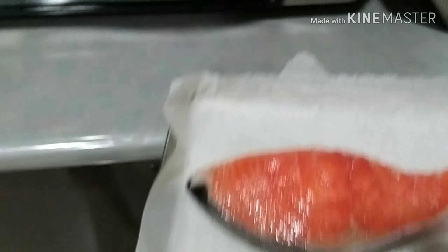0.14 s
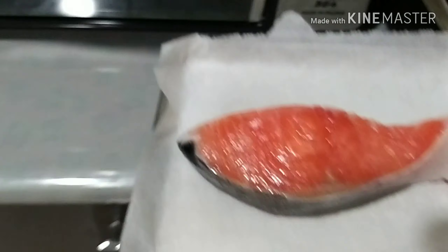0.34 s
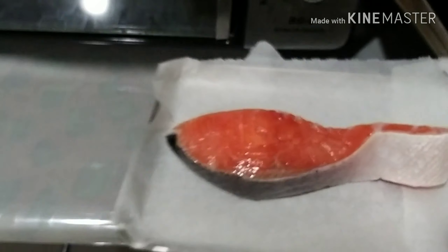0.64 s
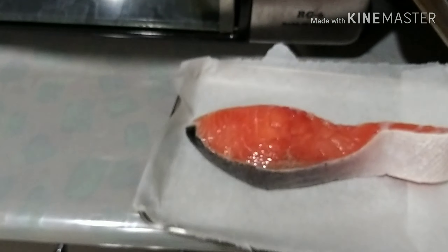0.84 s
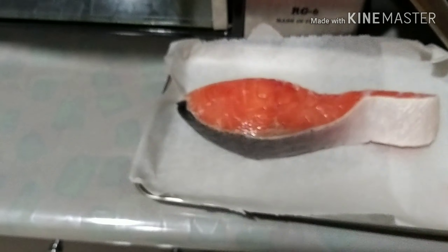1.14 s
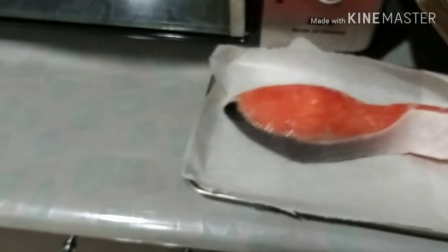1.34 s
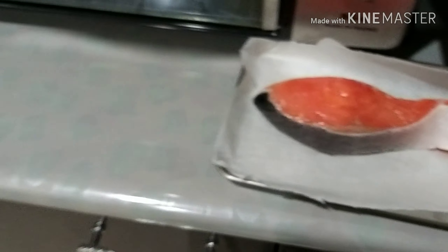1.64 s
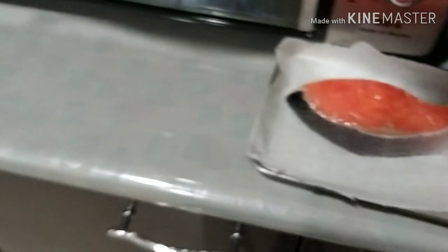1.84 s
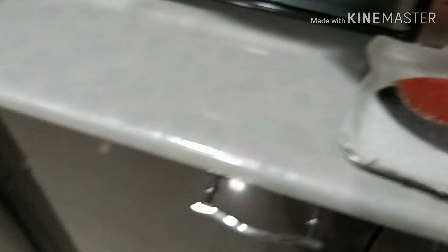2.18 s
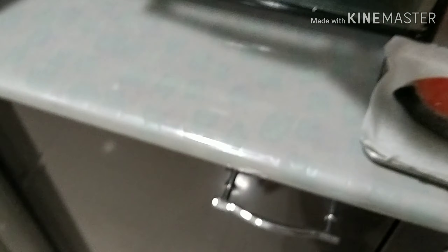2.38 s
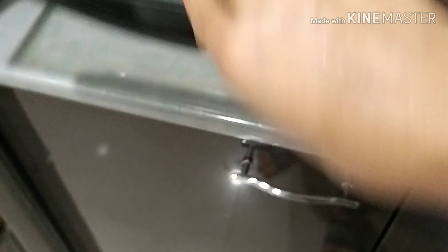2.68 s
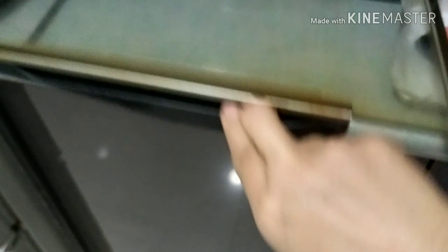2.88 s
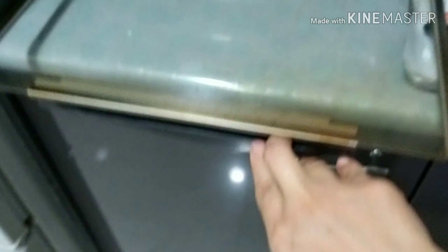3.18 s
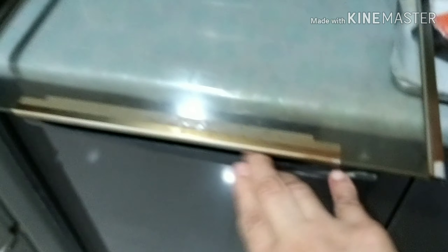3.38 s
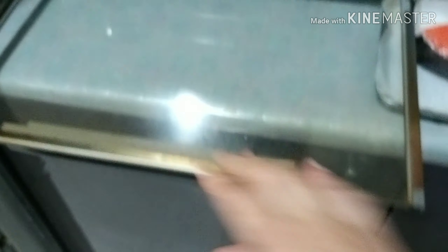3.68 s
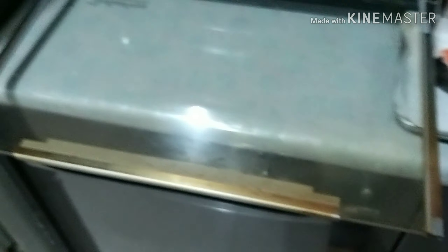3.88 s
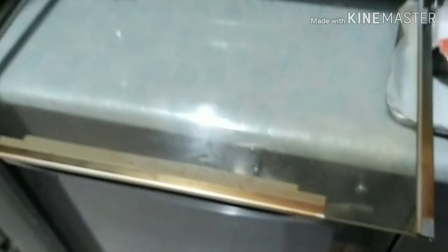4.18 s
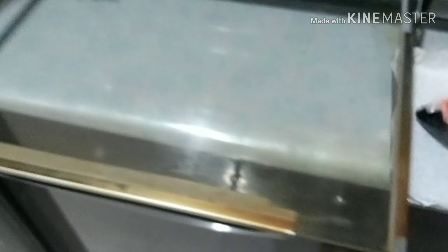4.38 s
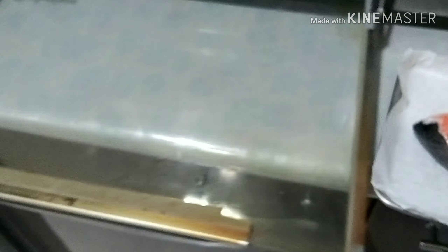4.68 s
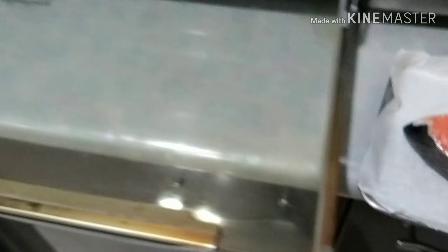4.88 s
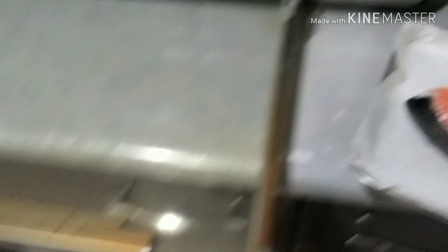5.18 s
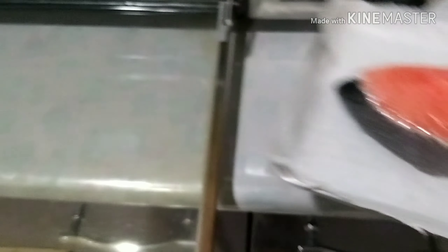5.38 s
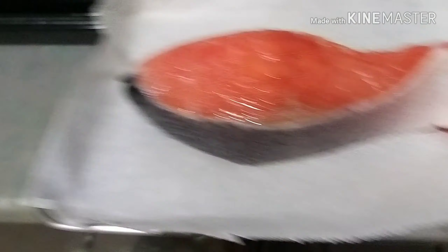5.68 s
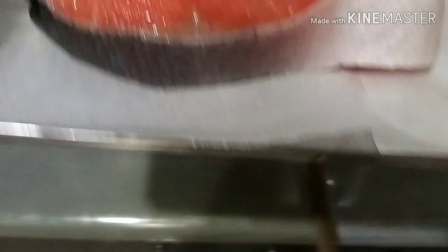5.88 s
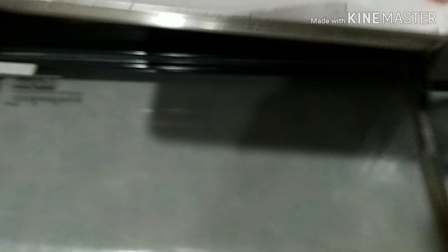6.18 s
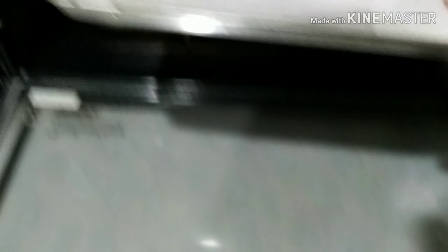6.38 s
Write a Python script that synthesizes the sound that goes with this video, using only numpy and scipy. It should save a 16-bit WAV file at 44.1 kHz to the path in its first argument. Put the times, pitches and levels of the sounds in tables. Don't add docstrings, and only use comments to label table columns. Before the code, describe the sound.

A quiet, hard-surfaced kitchen, close handheld microphone, with a steady low hush and slight hiss. Faint rubbing opens. At about 0.87 s a metal tray's corner bangs onto the counter, the loudest hit; its far edge bounces around 0.96-1.02, it rocks back at 1.07, scuffs and ticks, then clanks flat at 1.42 with a short thin ring and small touches until 1.6. From 2.1 low hand thumps and rubs begin, with a weak hinge squeak at 2.25 and dull jolts at 2.5 and 2.85. A harder door knock comes at 3.05, swaying low; dry squeaky chirps around 1 kHz run 3.3-3.65, followed by a thin, faint spring whine. At 4.3 the oven door drops onto its stop with a crash, glass and frame rattling quickly until 4.55. Quiet rubbing fades. At 5.7 the tray clicks free sharply, and around 6.45 it knocks onto the rack with a brief ring.

```python
import sys
import numpy as np
from scipy import signal
from scipy.fft import rfft, irfft
from scipy.io import wavfile
from scipy.ndimage import uniform_filter1d

SR = 44100
rng = np.random.default_rng(int(sys.argv[2]) if len(sys.argv) > 2 else 0)


def invert_db(x):
    u = np.asarray(x, float) / 20
    return 10 ** u


def generate_wav(signal):
    frames = np.transpose(np.atleast_2d(signal))
    scaled = np.clip(frames, -1, 1) * 32767
    pcm = np.round(scaled).astype(np.int16)
    wavfile.write(sys.argv[1], SR, pcm)


N = 287973


def evened(x):
    return x / np.sqrt(np.mean(x ** 2) + 1e-20)


def read(points, hz):
    f, value = np.transpose(points)
    return np.interp(np.log(hz + 1), np.log(f + 1), value)


def add(mix, s, sound):
    part = mix[round(s * SR):][:len(sound)]
    part += sound[:len(part)]


def band(x, lo, hi):
    return signal.sosfilt(signal.butter(3, [lo, hi], "band", fs=SR, output="sos"), x)


def coloured(points, patchy_db):
    frames, hz = N // 256 + 5, np.fft.rfftfreq(1024, 1 / SR)
    a, b, patches = rng.standard_normal((frames, 513, 3)).T
    patches = uniform_filter1d(patches, size=10, axis=0)
    patches = evened(uniform_filter1d(patches, size=12, axis=1))
    patches = patchy_db * patches / (1 + hz[:, None] / 2500)
    z = (a + 1j * b) * invert_db(read(points, hz)[:, None] + patches)
    return evened(signal.istft(z, nperseg=1024, noverlap=768)[1][:N])


def swell(s, rise_s, fall_s):
    bend = 0.71
    start = max(s - 2 * rise_s, 0)
    t = np.arange(start - s, 2 * fall_s, 1 / SR)
    return start, invert_db(-20 * abs(t / np.where(t < 0, rise_s, fall_s)) ** bend)


def room_floor():
    # (frequency [Hz], density [dB per Hz])
    floor_colour = [(20, -35), (35, -14), (60, 1.5), (120, -1), (230, -3), (400, -8), (700, -16),
                    (1300, -23.5), (2600, -25.5), (3600, -21.5), (5500, -23.5), (9000, -26), (15500, -23)]
    return invert_db(-59) * coloured(floor_colour, patchy_db=1.7)


def room():
    # (frequency [Hz], t60 [s])
    decay = [(100, 0.57), (260, 0.91), (700, 0.28), (1840, 0.54), (4850, 0.24), (12000, 0.53)]
    taps = np.zeros(SR // 2 + SR // 4)
    at = np.arange(330, len(taps) - 20, 16)
    taps[at + rng.integers(0, 16, len(at))] = rng.choice([-1., 1.], len(at))
    hz, t, z = signal.stft(taps, SR, nperseg=256)
    tail = signal.istft(z * invert_db(-60 * t / read(decay, hz)[:, None]), SR, nperseg=256)[1]
    return tail / np.linalg.norm(tail)


def rumble():
    # (time of peak [s], rise [s], fall [s], level [dB])
    heaves = [(2.08, 0.027, 0.18, -64), (2.27, 0.11, 0.03, -65), (2.35, 0.072, 0.046, -57.5),
              (2.548, 0.071, 0.24, -47.5), (2.86, 0.077, 0.1, -55), (3.13, 0.069, 0.13, -51.5),
              (3.33, 0.24, 1, -65.5), (3.689, 0.17, 0.052, -47.5), (3.81, 0.16, 1, -54),
              (4.05, 0.018, 0.18, -61), (4.34, 0.034, 0.14, -42)]
    # (frequency [Hz], density [dB per Hz])
    rumble_colour = [(35, -44), (70, 10), (100, -6), (160, -13), (230, 4), (330, -5), (500, -7.5),
                     (900, -16), (2000, -45)]
    effort = np.zeros(N)
    for s, rise_s, fall_s, peak_db in heaves:
        start, gain = swell(s, rise_s, fall_s)
        add(effort, start, invert_db(peak_db) * gain)
    return effort * band(coloured(rumble_colour, patchy_db=1.5), 62, 2000)


def thumps():
    # (time [s], level [dB], pitch [Hz], t60 [s])
    blows = [(0.867, -51, 348, 0.23), (1.07, -54, 370, 0.098), (1.363, -30.5, 332, 0.023),
             (1.424, -43, 105, 0.19), (2.083, -41, 113, 0.1), (2.35, -46, 90, 0.081),
             (2.541, -36, 207, 0.14), (2.561, -41.5, 198, 0.12), (2.854, -48, 307, 0.1),
             (3.058, -44, 140, 0.15), (3.056, -37, 288, 0.2), (3.107, -39, 225, 0.1),
             (3.564, -57, 228.6, 0.49), (3.652, -45, 237, 0.13), (3.688, -43, 231, 0.095),
             (3.79, -41, 269, 0.22), (2.543, -41.5, 87, 0.16), (3.664, -43, 85, 0.26),
             (4.046, -36, 436, 0.049), (4.305, -37.5, 382.5, 0.18), (4.419, -39, 196, 0.11),
             (4.494, -31, 260, 0.032), (6.44, -39, 275, 0.18), (6.498, -39.5, 230, 0.14)]
    out, t = np.zeros(N), np.arange(SR // 2) / SR
    for s, peak_db, hz, t60 in blows:
        wobble = evened(band(rng.standard_normal(len(t)), 0.44 * hz, 1.17 * hz))
        shape = invert_db(-60 * t / (t60 + .01)) * (1 - np.exp(-t / .007))
        add(out, s, invert_db(peak_db) * shape * (np.sin(2 * np.pi * hz * t) + 0.78 * wobble))
    return out


def booms():
    # (time [s], hold [s], fade [s], level [dB], pitch [Hz])
    sways = [
        (3.057, 0.044, 0.046, -40, 93.4),
        (3.125, .02, 0.046, -43, 90.5),
        (3.798, 0.033, .05, -48, 81),
    ]
    # (time [s], hold [s], fade [s], level [dB], pitch [Hz])
    panel_rings = [(.869, 0.0079, 0.028, -32, 860), (.87, 0.0088, 0.041, -36.5, 713),
                   (.869, .01, .06, -36.5, 1411), (.884, 0.0092, .04, -40, 2246),
                   (.962, 0.0074, 0.037, -32, 730), (1.419, 0.0069, 0.034, -35, 870),
                   (1.44, 0.014, 0.022, -35, 799), (1.45, 0.02, .08, -48, 269.4),
                   (3.055, 0.0028, 0.054, -57, 3620), (4.44, .02, .04, -51, 4300),
                   (4.49, 0.017, 0.036, -53.5, 1993), (5.709, .002, 0.027, -53, 4030)]
    out, t = np.zeros(N), np.arange(SR // 4) / SR
    for s, hold_s, fade_s, level_db, hz in sways + panel_rings:
        shape = (1 - np.exp(-t * hz / 0.5)) * invert_db(-20 * np.maximum(t - hold_s, 0) / fade_s)
        add(out, s, invert_db(level_db) * shape * np.sin(2 * np.pi * hz * t))
    return out


def rubs():
    # (time of peak [s], rise [s], fall [s], fizz level [dB], body relative to fizz [dB])
    strokes = [(0.021, 0.063, 0.19, -64, -7), (0.17, 0.098, 0.12, -66.5, 5.5),
               (1.148, 0.048, 0.074, -56, 3), (1.196, 0.016, 0.035, -54, -7), (1.36, 0.18, 0.28, -52.5, 0),
               (3.334, 0.044, 0.068, -62, 6), (3.65, .015, 0.031, -73, 15), (1.5, 0.033, 0.12, -62, -7),
               (1.612, 0.026, 0.097, -59.5, 3), (2.2, 0.37, 0.95, -62.5, -8), (2.6, 0.23, 0.2, -74, 11),
               (2.87, 0.077, 0.15, -74, -1), (3.542, 0.052, 0.068, -53.5, -5.5),
               (3.625, 0.004, 0.19, -63, 9.5), (3.88, 0.83, 0.75, -71.5, 5.5),
               (4.268, 0.063, 0.035, -51.5, 1), (4.306, 0.002, 0.088, -42, 7.5),
               (4.345, 0.018, .04, -49, 6), (4.379, 0.055, 0.05, -40.5, 0), (4.408, .03, .06, -47.5, 4.5),
               (4.44, 0.017, 0.054, -53, 1), (4.462, .02, 0.063, -51, -9), (3.057, 0.0052, 0.071, -56, 5),
               (4.54, 0.057, 0.27, -63, 6), (4.812, 0.17, 0.37, -67, -7), (4.985, 0.012, 0.23, -69, 4),
               (5.735, 0.044, .06, -57, -6), (5.785, 0.06, 0.044, -57.5, 0.5),
               (0.895, 0.019, 0.065, -51, 12), (5.934, .015, 0.083, -66, -7), (6.45, 0.013, 0.13, -58, 12),
               (6.52, 0.072, 0.074, -47, -2)]
    slips_per_s, spread_db, top_db = 1800, 4.2, -8.5
    slips = invert_db(spread_db * np.minimum(rng.exponential(1, N), 3.5))
    slips = slips * (rng.random(N) < slips_per_s / SR)
    slips = evened(slips * rng.standard_normal(N)) + 1.24 * rng.standard_normal(N)
    low, mid = evened(band(slips, 480, 990)), evened(band(slips, 1150, 2400))
    fizz, top = evened(band(slips, 2700, 4980)), evened(band(slips, 6500, 10800))
    body = evened(low + invert_db(-1.0) * mid)
    speed, weight = np.zeros(N), np.zeros(N)
    for s, rise_s, fall_s, fizz_db, body_db in strokes:
        start, gain = swell(s, rise_s, fall_s)
        add(speed, start, invert_db(fizz_db) * gain)
        add(weight, start, invert_db(fizz_db + body_db) * gain)
    return speed * (fizz + invert_db(top_db) * top) + weight * body


def ticks():
    # (time [s], level [dB], pitch [Hz], t60 [s])
    touches = [(1.168, -43, 4230, 0.0044), (1.183, -50, 2920, 0.011), (1.194, -41.5, 2420, 0.022),
               (1.3116, -39, 2120, 0.0062), (1.5484, -53, 3000, 0.009), (1.612, -44, 3980, 0.014),
               (2.359, -50, 4000, 0.016), (2.908, -46.5, 4560, 0.0045), (3.621, -54.5, 4780, 0.02),
               (4.2302, -49, 2740, 0.015), (5.68, -58, 4130, 0.021), (5.708, -40, 4000, 0.0086),
               (5.7184, -61, 4130, 0.01), (5.756, -49, 3200, 0.01), (5.776, -51, 2100, 0.011),
               (5.7875, -50, 2430, 0.01), (5.934, -61, 4400, 0.01)]
    out, t = np.zeros(N), np.arange(SR // 20) / SR
    for s, peak_db, hz, t60 in touches:
        spread, phase = rng.random((2, 12, 1))
        tick = np.sin(2 * np.pi * (hz * (0.748 + 0.642 * spread) * t + phase)).sum(0)
        tick = tick * invert_db(-60 * t / (t60 + 0.0026)) * (1 - np.exp(-t / 0.00072))
        add(out, s, invert_db(peak_db + 3.5) * tick / abs(tick).max())
    return out


def snaps():
    # (time [s], level [dB], low edge [Hz], high edge [Hz], t60 [s])
    clicks = [(1.149, -45, 4000, 9100, 0.025), (1.195, -34, 4500, 13600, 0.046),
              (1.548, -44, 3000, 8000, 0.034), (2.907, -55.5, 1870, 2380, 0.033),
              (4.261, -48, 500, 9000, .03), (4.358, -36, 800, 6000, 0.012), (4.399, -32, 800, 5970, 0.006),
              (1.4188, -25, 3560, 6630, 0.0088), (3.621, -44, 1500, 5500, 0.03),
              (4.047, -53, 296, 1200, 0.048), (5.7079, -28, 3380, 5200, 0.0083),
              (5.7097, -31, 1500, 15200, 0.032), (5.718, -45, 5000, 14000, .02),
              (6.5, -39, 14200, 15400, .03)]
    out, t = np.zeros(N), np.arange(SR // 20) / SR
    for s, peak_db, low_hz, high_hz, t60 in clicks:
        puff = band(rng.standard_normal(len(t)) * invert_db(-60 * t / t60), low_hz, high_hz)
        add(out, s, invert_db(peak_db) * puff / abs(puff).max())
    return out


def stick_slip(rows, waver, half_db, third_db):
    out = np.zeros(N)
    for s, rise_s, fall_s, level_db, hz in rows:
        start, gain = swell(s, rise_s, fall_s)
        gain = gain[:SR]
        drift, flutter = (evened(uniform_filter1d(v, size=300))[:len(gain)]
                          for v in rng.standard_normal((2, SR)))
        turn = 2 * np.pi * np.cumsum(hz * (1 + waver * drift)) / SR
        tone = np.sin(turn) + invert_db(half_db) * np.sin(turn / 2) + invert_db(third_db) * np.sin(3 * turn)
        level = invert_db(level_db + 8.5 + 3.5 * np.clip(flutter, -3, 1.5))
        add(out, start, level * gain * tone)
    return out


def hinge_squeaks():
    # (time of peak [s], rise [s], fall [s], level [dB], pitch [Hz])
    squeak_rows = [
        (2.245, 0.05, 0.085, -63.5, 1053),
        (2.35, .04, 0.11, -70, 1024),
        (3.315, .01, 0.054, -58, 1056),
        (3.37, 0.081, 0.11, -66, 1042),
        (3.53, 0.0098, 0.032, -59.5, 1046),
        (3.555, 0.035, 0.01, -56, 1030),
        (3.585, 0.014, 0.05, -60, 1073),
        (3.62, 0.033, 0.016, -60.5, 1020),
        (3.645, 0.014, 0.04, -62.5, 1150),
    ]
    return stick_slip(squeak_rows, waver=.03, half_db=-30, third_db=-12)


def spring_whine():
    # (time of peak [s], rise [s], fall [s], level [dB], pitch [Hz])
    whine_rows = [
        (3.86, 0.1, 0.46, -76, 3545),
        (3.54, 0.04, 0.043, -68, 2500),
        (3.79, 0.026, 0.032, -73, 2500),
        (4.5, 0.024, 0.049, -76, 3500),
    ]
    return stick_slip(whine_rows, waver=.005, half_db=-6, third_db=-40)


def knocks(rows, modes, top_db, ring_db, crack_db, crack_s, chatter_s):
    centres = [900, 2100, 4300, 10000]
    out, t = np.zeros(N), np.arange(SR // 4) / SR
    hz, mode_db, mode_t60 = np.transpose(modes)
    mode_t60 = np.clip(mode_t60, .03, np.minimum(.25, 360 / hz))
    rings = invert_db(-60 * t / mode_t60[:, None]) * np.sin(2 * np.pi * hz[:, None] * t)
    crowd_hz = np.fft.rfftfreq(len(t), 1 / SR)
    crowd = invert_db(read([(150, -9.0), (450, 2.0), (1200, -0.5), (9000, -14.0), (16000, -20.5)], crowd_hz))
    shares, crowd_shares = (np.array([read(list(zip(centres, row)), f) for row in np.eye(len(centres))])
                            for f in (hz, crowd_hz))
    centre_hz = np.array(centres)[:, None]
    for s, peak_db, mid_db, high_db, t60 in rows:
        luck, contacts = rng.standard_normal(len(hz)), rng.random((2, 1500))
        strike = np.sign(luck) * invert_db(ring_db + mode_db + 2 * luck)
        clatter = irfft(rfft(rng.standard_normal(len(t))) * crowd * crowd_shares, len(t))
        clatter = clatter * invert_db(-60 * t / 0.87)
        chatter = (contacts[0] < .02) * (contacts[1] - .5) * 0.63
        chatter = chatter * np.exp(-t[:1500] / chatter_s)
        chatter[0] = 1
        fade = invert_db(-60 * t / (t60 * (centre_hz / 2000) ** -.15 + 0.017))
        fade = fade + invert_db(crack_db) * np.exp(-t / crack_s)
        rise = 1 - np.exp(-t * centre_hz / 3.5)
        parts = ((shares * strike) @ rings + clatter) * fade * rise
        parts = signal.fftconvolve(parts, chatter[None], axes=1)
        peaks = invert_db(peak_db + np.array([0, mid_db, high_db, high_db + top_db])) / abs(parts).max(1)
        add(out, s, peaks @ parts)
    return out




def rack_knocks():
    # (time [s], level [dB], mid [dB], high [dB], t60 [s])
    blows = [
        (6.434, -37, 6, 3.5, 0.17),
        (6.443, -40, 8, -10, 0.63),
        (6.493, -32.5, -16, -10, 0.32),
        (6.501, -36, -10, 3.5, 0.047),
        (6.513, -34, -12, -10, 0.13),
    ]
    # (pitch [Hz], level [dB], t60 [s])
    modes = [(500, -8, 0.057), (730, -10, .1), (992, -1.5, 0.14), (1130, -10, 0.09), (1390, -13, .15),
             (1628, 0.5, 0.24), (1850, -13, 0.09), (2364, -8, 0.23), (2970, -11, .06), (3200, -20, .13),
             (3220, -9, 0.21), (3540, -11, .1), (4130, -20, 0.22), (4870, -22, .054)]
    return knocks(blows, modes, top_db=-6.5, ring_db=-6.5, crack_db=-27, crack_s=.004, chatter_s=0.022)


def door_knocks():
    # (time [s], level [dB], mid [dB], high [dB], t60 [s])
    blows = [
        (2.519, -54.5, -4, -7, 0.8),
        (2.845, -51, -16, -9, 0.5),
        (3.054, -36.5, -8.5, -1.5, 0.99),
        (3.305, -45.5, -4.5, -3.5, 0.72),
        (3.527, -57, -6, -8, 0.33),
        (3.623, -56, -20, -14, 0.19),
        (4.048, -49, -8, -12, 0.58),
    ]
    # (pitch [Hz], level [dB], t60 [s])
    modes = [(781, 2, 0.48), (920, -11, 0.45), (1115, -4, 0.12), (1400, -39, 5.0), (1780, -18, 0.47),
             (1920, -5.5, 1.7), (2200, -31, 0.15), (2800, -39, 5.0), (3180, -26, 0.42), (3650, -1, 0.1),
             (4290, -14, 0.16), (4506, -49, 5.0), (4660, -19, 0.17), (5200, -17, 0.29)]
    return knocks(blows, modes, top_db=-2.5, ring_db=-7.0, crack_db=8.0, crack_s=0.004, chatter_s=0.0094)


def door_stop():
    # (time [s], level [dB], mid [dB], high [dB], t60 [s])
    blows = [
        (4.229, -52, -1, 7, 0.21),
        (4.261, -38, -17, -9, 0.31),
        (4.302, -27.5, -17, -7.5, 0.39),
        (4.309, -26, -4, -4, 0.3),
        (4.331, -34, 3, -8, 0.23),
    ]
    # (pitch [Hz], level [dB], t60 [s])
    modes = [(448, -1.5, 1.1), (710, -0.5, 5.0), (1040, -8, 0.54), (1140, -7, 5.0), (1734, -8, 3.4),
             (2770, -6, 0.25), (2880, -13, 0.21), (3200, -35, 5.0), (3460, -24, 0.13), (3500, -29, 5.0),
             (4000, -14, 0.085), (4500, -22, 5.0), (4940, -13, 0.043), (5650, -13, 0.45)]
    return knocks(blows, modes, top_db=-1.0, ring_db=-11, crack_db=6.5, crack_s=0.0029, chatter_s=0.026)


def door_rebound():
    # (time [s], level [dB], mid [dB], high [dB], t60 [s])
    rebounds = [
        (4.355, -31, -3, -4, 0.13),
        (4.369, -30.5, -1, 4, 0.34),
        (4.386, -29, -3, -1, 0.084),
        (4.407, -39, 3, 4, 0.16),
        (4.425, -42, -12, 4, 0.26),
        (4.455, -50, -18, 10, 0.2),
        (4.496, -55, -5, 7, 0.12),
        (4.544, -57.5, -17, 10, 0.35),
    ]
    # (time [s], level [dB], mid [dB], high [dB], t60 [s])
    touches = [
        (4.322, -43, 0, -6, .06),
        (4.339, -37, -6, -8, 0.066),
        (4.376, -29, -2, -3, .06),
        (4.396, -32.5, 7, 0, 0.052),
        (4.41, -43, -6, 1, 0.055),
        (4.438, -47, 4, -3, .08),
    ]
    # (pitch [Hz], level [dB], t60 [s])
    modes = [(550, -11, 0.61), (800, -1.5, 0.35), (1000, -4, 0.13), (1183, -5.5, 0.15), (1830, -13, 5.0),
             (1980, -33, 5.0), (2280, -8, 0.25), (2590, -16, 0.21), (3220, -16, 0.2), (3760, -13, 0.12),
             (3990, -14, 5.0), (4340, -15, 0.39), (4700, -24, 5.0), (5100, -14, 0.18)]
    out = knocks(rebounds, modes, top_db=-13, ring_db=-8.5, crack_db=8.0, crack_s=0.0025, chatter_s=0.025)
    return out + knocks(touches, modes, top_db=-15, ring_db=-10, crack_db=12, crack_s=0.0018, chatter_s=0.0032)


def tray_lifts():
    # (time [s], level [dB], mid [dB], high [dB], t60 [s])
    blows = [
        (5.708, -46.5, 7.3, 9.5, 0.11),
    ]
    # (pitch [Hz], level [dB], t60 [s])
    modes = [(620, 4, 0.097), (800, 6, 0.19), (2020, -12, 5.0), (2880, -17, 0.13), (3620, -10, 5.0),
             (4040, 1, 0.28), (4160, -2, 0.12), (5216, -18, 0.56)]
    return knocks(blows, modes, top_db=-6, ring_db=-7, crack_db=17, crack_s=0.0021, chatter_s=0.0032)


def tray_settles():
    # (time [s], level [dB], mid [dB], high [dB], t60 [s])
    blows = [
        (1.193, -47.5, 4, 5, 0.23),
        (1.311, -45, 2, 3.7, 0.13),
        (1.341, -43.5, -12, 1, 0.26),
        (1.6, -55.5, 1, 8.9, 0.26),
    ]
    # (pitch [Hz], level [dB], t60 [s])
    modes = [(823, -7, 0.091), (1480, -15, 0.29), (2060, -14, 0.68), (2540, -12, 0.21), (2800, -8, 0.94),
             (3180, -32, 0.26), (3000, -28, 0.11), (4000, -27, 0.59), (4400, -12, 0.18), (4500, -13, 0.26)]
    return knocks(blows, modes, top_db=3.0, ring_db=-6.0, crack_db=0.0, crack_s=0.004, chatter_s=0.016)


def tray_clanks():
    # (time [s], level [dB], mid [dB], high [dB], t60 [s])
    blows = [
        (1.406, -54.5, 9, 22, 0.065),
        (1.4155, -28, -4, 0.5, 0.17),
        (1.431, -27, -6.5, -5, 0.14),
        (1.452, -32.5, -2.5, -10, 0.33),
    ]
    # (time [s], level [dB], mid [dB], high [dB], t60 [s])
    weight = [
        (1.421, -24.5, -9, -9, 0.075),
        (1.427, -29, -6, -8, 0.069),
        (1.44, -35.5, -5, -11, 0.18),
        (1.484, -44, -9, -1, .15),
    ]
    # (pitch [Hz], level [dB], t60 [s])
    modes = [(483, -10, 0.05), (617, 3, 0.036), (830, -4, 0.071), (926, -11, 0.16), (1020, -9, 0.27),
             (1160, -8, 0.11), (1446, -11, .25), (1568, -12, .17), (2323, -5, 0.087), (2680, -13, 0.12),
             (3560, -27, .19), (3955, -25, 0.21), (4310, -16, .22), (5000, -16, 0.08)]
    out = knocks(blows, modes, top_db=-4.0, ring_db=-5.5, crack_db=2.0, crack_s=0.0025, chatter_s=0.0042)
    return out + knocks(weight, modes, top_db=-8, ring_db=-2, crack_db=13, crack_s=0.0037, chatter_s=.005)


def tray_rocks():
    # (time [s], level [dB], mid [dB], high [dB], t60 [s])
    blows = [
        (1.069, -28, -7, -12.5, 0.28),
    ]
    # (pitch [Hz], level [dB], t60 [s])
    modes = [(407, -6.5, 0.28), (557, 5.5, 0.069), (699, 1, 0.053), (833, -8, 0.16), (943, -1.5, 0.073),
             (1430, -10, 0.22), (1766, -27, 0.13), (1980, -16, .1), (2280, -23, .15), (2830, -14, .15),
             (3350, -20, .2), (3760, -15, .04)]
    return knocks(blows, modes, top_db=-12, ring_db=-2.0, crack_db=-3, crack_s=0.0054, chatter_s=0.0036)


def tray_bounces():
    # (time [s], level [dB], mid [dB], high [dB], t60 [s])
    blows = [
        (0.960, -25, -4, -15, 0.19),
        (1.008, -31.5, -4.5, -15, 0.078),
        (1.02, -39.5, -8, -9, 0.13),
    ]
    # (time [s], level [dB], mid [dB], high [dB], t60 [s])
    weight = [
        (0.964, -29, -6, -24, 0.19),
        (0.976, -31, -0.5, -24, .15),
    ]
    # (pitch [Hz], level [dB], t60 [s])
    modes = [(433, -11, 0.088), (722, 7, 0.077), (1022, 1, 0.15), (1502, -0.5, 0.1), (1907, -9, 0.19),
             (2430, -24, 0.23), (2720, -23, 0.15), (3128, -23, 1.7), (3461, -45, 5.0), (4100, -12, 0.087),
             (4420, -18, 0.069), (4700, -27, 0.12)]
    out = knocks(blows, modes, top_db=-13, ring_db=-7.5, crack_db=-1.0, crack_s=0.006, chatter_s=0.0054)
    return out + knocks(weight, modes, top_db=-15, ring_db=-7, crack_db=-2, crack_s=.004, chatter_s=0.0068)


def tray_lands():
    # (time [s], level [dB], mid [dB], high [dB], t60 [s])
    blows = [
        (0.867, -18.5, -2, -11.5, 0.38),
        (0.925, -42, 8, -16, 0.12),
    ]
    # (time [s], level [dB], mid [dB], high [dB], t60 [s])
    weight = [
        (0.8705, -17.5, -5, -22, 0.2),
        (0.879, -35, -11, -13, 0.25),
        (0.899, -38, 12, -16, 0.12),
    ]
    # (pitch [Hz], level [dB], t60 [s])
    modes = [(407, -12, .25), (528, 3, 0.28), (713, 6, 0.092), (872, 10.5, 0.049), (985, -2, 0.12),
             (2390, -21, 0.11), (1360, -2.5, 0.16), (1467, 1, 0.13), (1710, -6.5, 0.23), (1910, -5.5, .2),
             (2190, -19, 0.23), (2710, -36, 0.15), (3430, -15, .2), (3750, -16, .15)]
    out = knocks(blows, modes, top_db=-12.0, ring_db=-7.5, crack_db=11.0, crack_s=0.0033, chatter_s=0.0024)
    return out + knocks(weight, modes, top_db=-15, ring_db=-9, crack_db=7, crack_s=0.0036, chatter_s=0.0083)


def microphone(sound):
    # (frequency [Hz], gain [dB])
    response = [(40, -9), (90, -2), (1100, -1.5), (1500, -4), (2100, -2), (2700, -4.5), (3900, -0.5),
                (5500, -3.5), (7000, -6.5), (15000, -6.5)]
    return irfft(rfft(sound) * invert_db(read(response, np.fft.rfftfreq(N, 1 / SR))), N)


def scene():
    background = room_floor() + rumble()
    near = thumps() + booms() + rubs() + ticks() + snaps()
    near = near + hinge_squeaks() + spring_whine()
    near = near + rack_knocks()
    near = near + door_knocks() + door_stop() + door_rebound()
    near = near + tray_lifts() + tray_settles() + tray_clanks()
    near = near + tray_rocks() + tray_bounces() + tray_lands()
    echoes = invert_db(-7.5) * signal.fftconvolve(near, room())[:N]
    mono = microphone(near + echoes) + background
    return np.array([mono, mono])


def low_pass(x):
    return signal.sosfilt(signal.butter(12, 16450, fs=SR, output="sos"), x)


def record(dry):
    trace = invert_db(-87.5) * evened(band(rng.standard_normal(N), 7200, 10500))
    trace = trace + invert_db(-90.5) * evened(band(rng.standard_normal(N), 10500, 15000))
    trace = trace + invert_db(-25.5) * np.roll(band(dry[0], 1260, 3300), shift=200)
    trace = trace + invert_db(-25) * band(dry[0], 5000, 13000)
    both = dry + np.array([-trace, trace])
    edge = signal.firwin(511, 15560, fs=SR)[None]
    limited = signal.oaconvolve(both, edge, "same", axes=1)
    return low_pass(limited + invert_db(-41) * (both - limited))


dry = scene()
out = record(dry)
generate_wav(out)
```